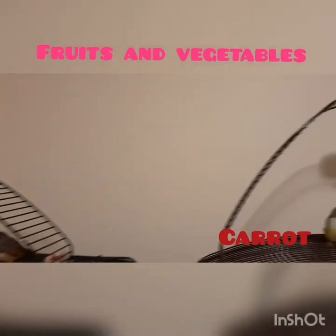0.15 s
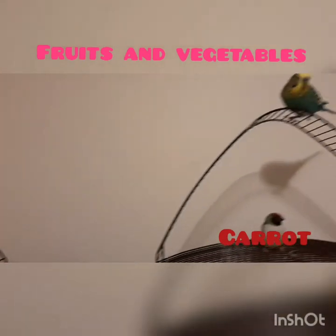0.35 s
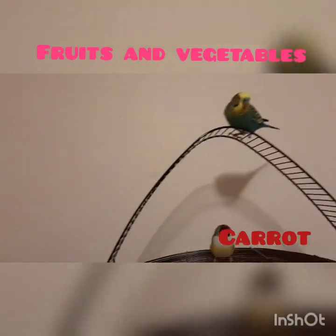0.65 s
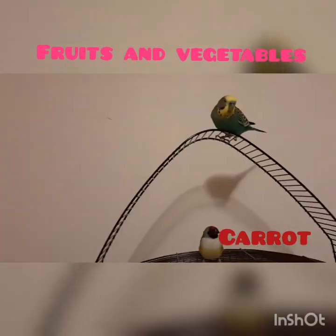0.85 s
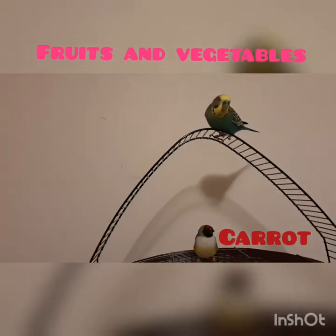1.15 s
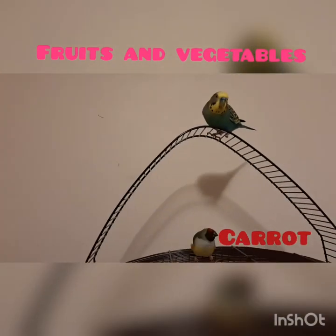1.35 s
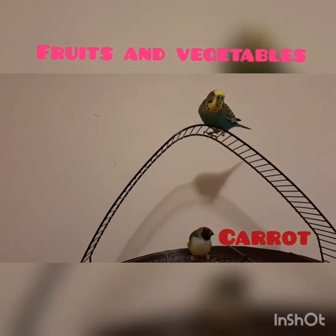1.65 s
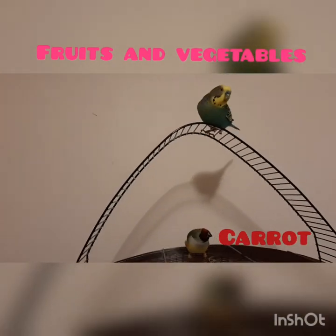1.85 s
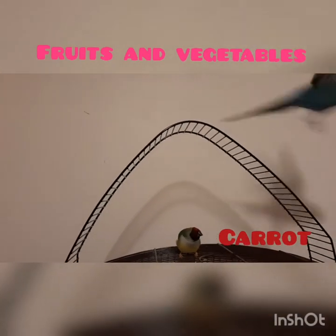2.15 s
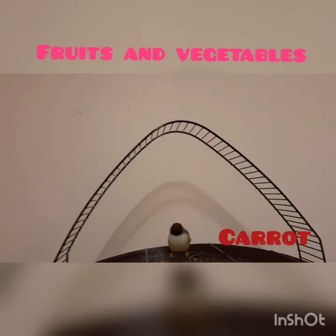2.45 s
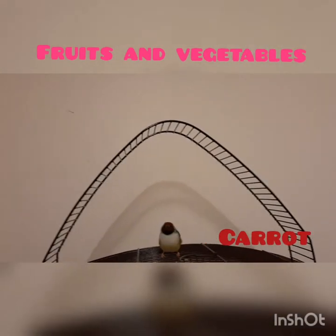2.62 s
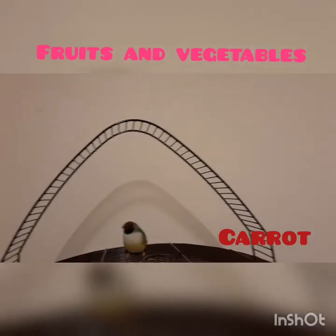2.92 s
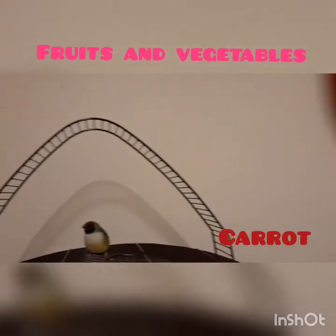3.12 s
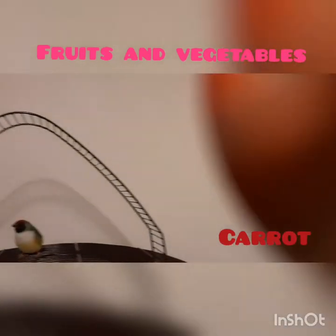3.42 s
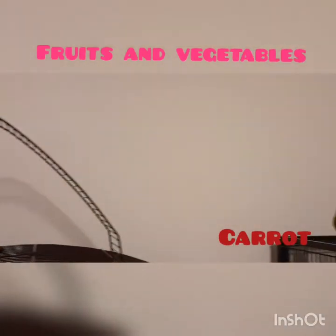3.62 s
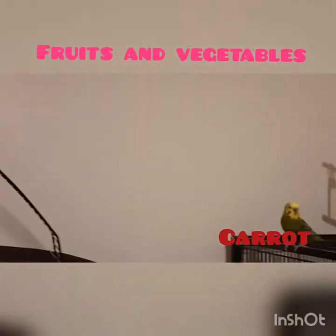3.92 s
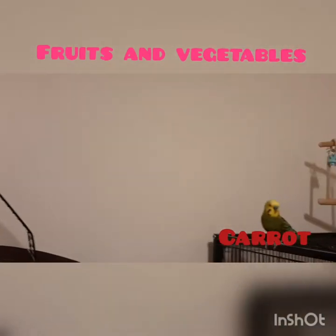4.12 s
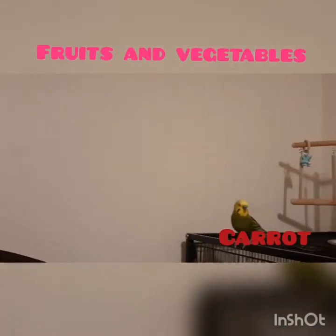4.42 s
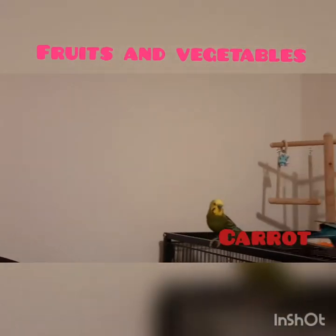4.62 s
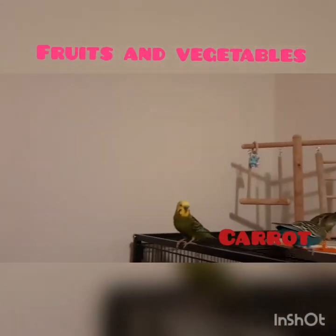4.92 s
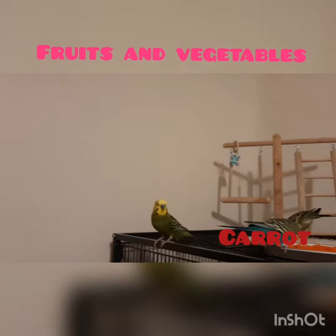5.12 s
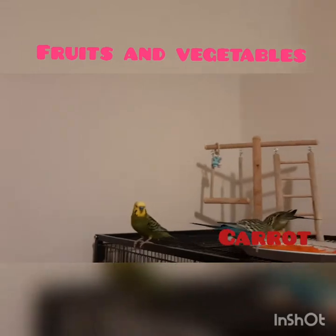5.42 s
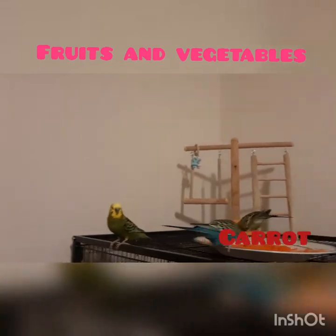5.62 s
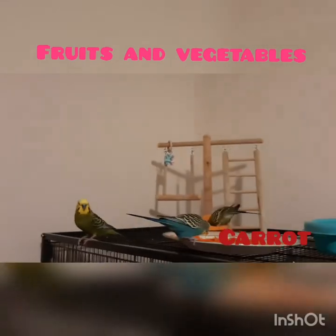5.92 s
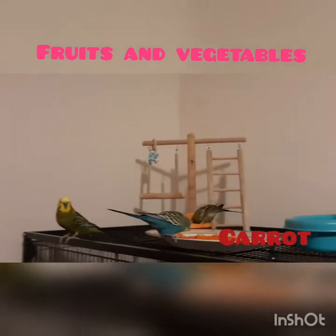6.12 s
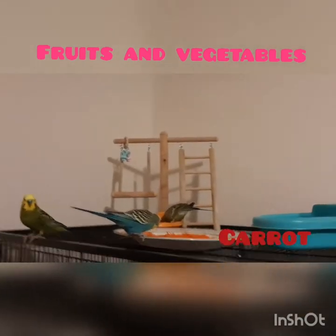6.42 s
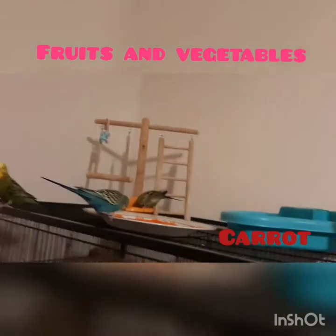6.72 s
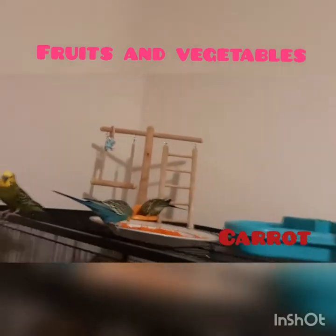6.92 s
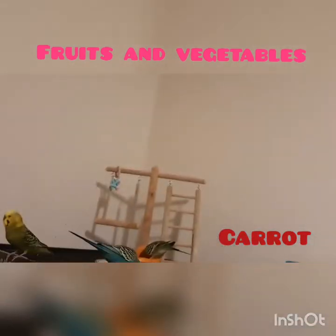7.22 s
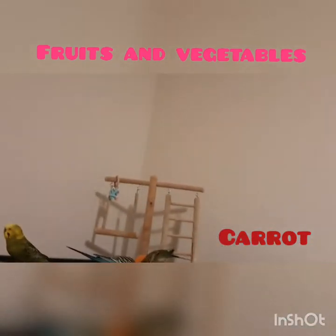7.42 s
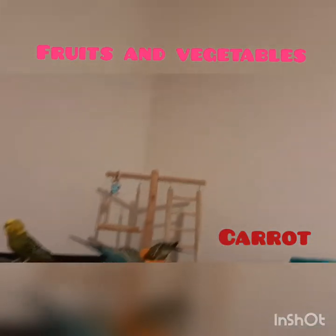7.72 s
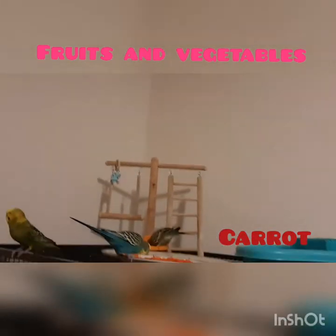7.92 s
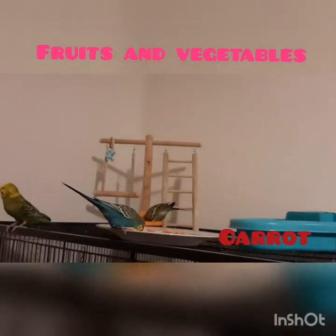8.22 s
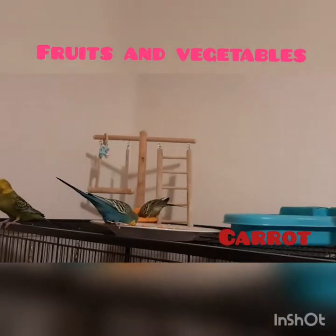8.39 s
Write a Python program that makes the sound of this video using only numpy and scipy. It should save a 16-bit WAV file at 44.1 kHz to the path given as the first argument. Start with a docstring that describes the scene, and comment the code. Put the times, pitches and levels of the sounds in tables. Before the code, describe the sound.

Scattered pet bird calls indoors, short nasal toots then sharp chirps and scratchy scolding, with feather swishes, soft bumps and a faint steady hum.

```python
"""Finches and budgerigars in a bare room

Pet birds call a metre or two from a hand-held phone, over a rush of room air and a faint hum.
Nasal notes, whistled chirps and raspy or warbled chatter are throat-filtered harmonics plus hiss, in a ringing room.
Feathers swish as shaped noise; a take-off puffs low noise at the microphone.
The hand adds ticks and soft bumps: short dry noise bursts."""
import sys
import numpy as np
from scipy import signal
from scipy.fft import rfft, irfft, next_fast_len
from scipy.io import wavfile
from scipy.ndimage import uniform_filter1d, minimum_filter1d

SR = 44100
rng = np.random.default_rng(int(sys.argv[2]) if len(sys.argv) > 2 else 0)


def dump(signal):
    """Clip the signal to [-1, 1] and save it as 16-bit WAV at the path in sys.argv[1]."""
    limited = np.clip(np.atleast_2d(signal).T, -1, 1)
    pcm = np.round(limited * 32767).astype(np.int16)
    wavfile.write(sys.argv[1], SR, pcm)


N = 377055
TIME_S = np.arange(N) / SR
TOP_HZ = 15800  # upper limit of harmonics and of the output

# room air, colour: [f/Hz, level/dB]
AIR_COLOUR = [(25, -38.5), (60, -17), (140, -17.5), (240, -9), (330, -4.5), (420, -0.5), (530, -0.5),
              (800, -10), (1400, -6.5), (1800, -13), (2600, -14), (4500, -21), (8500, -32.5), (15500, -28)]
# room air, level before trim: [t/s, level/dB]
AIR_LEVEL = [(0.0, -49.5), (0.74, -51), (1.29, -45.5), (2.21, -51.5), (3.79, -52.5), (4.86, -48.5),
             (6.0, -48), (6.43, -53), (8.55, -53.5)]
# room air, correlation of the two ports: [f/Hz, correlation/1]
AIR_CORRELATION = [(60, 0.68), (300, 0.77), (600, 0.7), (1200, -0.06), (3000, 0.08), (12000, -0.95)]
# room air, left minus right: [f/Hz, level/dB]
AIR_BALANCE = [(60, -6), (250, -2.5), (1000, -2), (2500, -4), (5000, -5.5), (12000, -4.5)]
HUM_HZ, HUM_DB = 410.3, -60.5

# wing draught, colour: [f/Hz, level/dB]
DRAUGHT_COLOUR = [(28, -12.5), (45, -5.5), (80, -2.5), (130, -7.5), (250, -21.5), (600, -40.5)]
DRAUGHT_PEAK_S, DRAUGHT_LEAD_S, DRAUGHT_DB = 2.51, 0.42, -47.5
DRAUGHT_RISE_DB_PER_S, DRAUGHT_FALL_DB_PER_S = 37, 130

# light ticks at the phone, level before decay: [t/s, level/dB, centre f/Hz, left minus right/dB]
TICKS = [(0.027, -25, 7000, -6), (0.164, -31, 6900, -9), (.301, -33, 5740, -9), (.972, -19, 4300, -6),
         (2.442, -25.5, 1410, 3.5), (3.053, -34, 9000, -2), (3.29, -23, 10900, -25.5),
         (3.424, -28, 10500, -20), (3.733, -24.5, 7700, -6), (4.368, -29.5, 11400, -22.5),
         (5.746, -40.5, 11000, -13)]
# bumps of the hand, level before trim: [t/s, level/dB, centre f/Hz]
BUMPS = [(0.331, -45, 120), (0.528, -42.5, 82), (3.038, -49, 92), (3.344, -45.5, 97), (3.759, -52, 62),
         (4.041, -42.5, 176), (5.789, -41.5, 66.5), (6.65, -45.5, 64), (6.893, -34.5, 123)]
TICK_DECAY_S, BUMP_PAN_DB = 0.0005, -16

# feather flicks, level before swell: [t/s, length/s, level/dB, tilt/(dB/octave)]
FLICKS = [(0.019, 0.032, -36, 2.5), (.465, 0.071, -48.5, 8), (2.161, .18, -50.5, 2),
          (5.705, 0.079, -48.5, 2), (6.625, 0.086, -45, 2.5), (8.007, 0.028, -49, 1.5)]
# feather colour before tilt: [f/Hz, level/dB]
FEATHER_COLOUR = [(700, 6), (2000, 14.5), (5000, 9.5), (8000, -2.5), (11000, -2.5), (15000, -4.5)]

# reverberation: [f/Hz, T60/s]
ROOM_T60 = [(1500, 0.53), (3000, 0.41), (5000, 0.5), (9000, .38), (15000, 0.42)]
# share of the nominal port level difference that is applied: [f/Hz, share/1]
PORT_SHADOW = [(1500, 0.9), (2700, 0.85), (4200, 0.81), (6300, 0.84), (8500, 0.69), (14000, 0.46)]

# what throat and beak let through, before brightness: [f/Hz, level/dB]
NASAL_THROAT = [(750, -25), (1500, -13.5), (2250, -17.5), (3000, -2.5), (3800, 0), (4550, 0.5),
                (5300, -7.5), (6100, -15.5), (7600, -22), (8900, -35.5), (12000, -24.5), (15500, -41.5)]
WHISTLE_THROAT = [(2300, -23), (3000, -19.5), (4200, 6), (5800, -2), (7000, -10), (8200, -18),
                  (9900, -10.5), (10800, -20), (12200, -16.5), (13500, -21), (15500, -30)]
LOW_THROAT = [(2300, -13.5), (3200, -0.5), (4600, -1), (6100, -7), (7500, -28), (9200, -27), (12000, -27),
              (15500, -38.5)]
SHARP_THROAT = [(2050, -23), (2500, -11), (3300, -4.5), (4200, -1.5), (5200, -1), (6200, -8), (7500, -14),
                (9000, -21.5), (10200, -19.5), (12600, -16.5), (15500, -26)]
CHIRRUP_THROAT = [(1500, -37), (1900, -21), (2400, -2), (3000, 4.5), (3700, -6), (4500, -12.5),
                  (5600, -21.5), (6500, -25.5), (7700, -26.5), (9300, -38), (11000, -42.5), (14000, -40)]
RASP_THROAT = [(1200, -45), (1900, -21.5), (2500, -9.5), (3400, 3), (4500, -4), (5800, 3.5), (7000, -11.5),
               (8600, -15.5), (10000, -18.5), (15500, -24)]
# raspy syllables, before bend, swell and room:
# [t/s, length/s, f/Hz, level/dB, 3-6 kHz brightness/(dB/octave), roughness/1 (clipped to 0-1)]
RASPS = [(3.08, .15, 625, -33.5, -3.5, 0.84), (3.282, .14, 603.3, -31.5, -2, 0.84),
         (3.45, .12, 605.5, -32.5, -6, 1.02), (3.72, .12, 593.6, -35, -2.5, 1.06),
         (3.9, 0.11, 596, -36.5, -6, 0.85), (5.056, 0.032, 959, -44.5, 8, 0.53),
         (5.08, 0.062, 968, -28.5, 7, 0.8), (6.115, 0.072, 944, -48.5, -6, 0.82)]
# soft warbled syllables: columns as RASPS
WARBLES = [(.77, .18, 2910, -40, 8, 0.81), (.935, 0.11, 2746, -36.5, -7.5, 0.62),
           (2.872, 0.049, 3540, -41, 3, 0.42), (2.905, 0.104, 2897, -37.5, 3, 0.97),
           (2.99, 0.065, 3596, -38.5, 6.5, 1.06), (4.52, 0.11, 2960, -51, 16, 1.1),
           (4.67, 0.11, 2710, -48, 14.5, 1.07), (5.56, .11, 2912, -46.5, 24.5, .36),
           (5.68, 0.098, 2495, -47, 4.5, 0.9), (6.555, 0.059, 2133, -44.5, 8, 0.39),
           (6.612, 0.085, 3307, -38.5, 1.5, 0.44)]
# notes of the loud calls, before quaver, gate and room; where two overlap, both sides of the syrinx sing:
# [t/s, length/s, first f/Hz, middle f/Hz, last f/Hz, level/dB, swell over the note/dB, roughness/1, voice]
NOTES = [(1.154, 0.036, 722, 745, 735, -31.5, 6.5, 0.02, "nasal"),
         (1.193, 0.045, 748.5, 765.8, 748, -23.5, 0, 0.05, "nasal"),
         (1.316, 0.081, 712, 727.3, 757.5, -25, 4.5, 0.13, "nasal"),
         (1.662, 0.028, 4780, 4330, 4410, -31.5, 18, 0.22, "long"),
         (1.682, 0.024, 4290, 4440, 4340, -20.5, 18, 0.12, "long"),
         (1.692, 0.052, 4754, 4890, 4810, -18.5, 4.5, 0.14, "long"),
         (1.712, 0.049, 3220, 2985, 3138, -21, 10.5, 0.11, "low"),
         (1.714, 0.05, 4470, 4420, 4300, -14.5, 6, .24, "long"),
         (1.75, 0.067, 4182, 4057, 4215, -13.5, -1.5, .08, "long"),
         (2.538, 0.013, 3600, 3840, 3970, -22.5, 0.5, 0.3, "rising"),
         (2.553, 0.012, 4320, 4087, 3940, -10, -2, 0.18, "rising"),
         (2.542, 0.0079, 2490, 2334, 2320, -18.5, 0, 0.31, "low"),
         (2.565, 0.019, 4350, 4950, 6060, -14.5, -3, 0.1, "rising"),
         (2.586, 0.017, 5760, 6057, 5907, -13.5, -4.5, 0.16, "rising"),
         (6.265, 0.0062, 1880, 1850, 1860, -27, -5, 0.14, "sharp"),
         (6.272, 0.011, 3280, 2555, 2470, -17.5, 5.5, 0.22, "sharp"),
         (6.283, 0.011, 2503, 2460, 2880, -15, -6, 0.18, "sharp"),
         (6.294, 0.019, 2094, 2092, 2110, -23, -6.5, 0.22, "sharp"),
         (6.303, 0.015, 2906, 2582, 2750, -16.5, -0.5, .19, "sharp"),
         (7.071, 0.025, 1637, 1730, 1850, -39, 29, 0.27, "chirrup"),
         (7.097, 0.042, 1843, 1875, 1760, -25, 1, 0.26, "chirrup"),
         (7.135, 0.011, 2276, 2394, 2580, -25.5, 4, .4, "chirrup"),
         (7.142, 0.037, 2843, 2920, 2915, -23, 0, 0.19, "chirrup"),
         (7.163, 0.0423, 1683, 1745, 1680, -24, -6, 0.46, "chirrup")]
# voices: [throat, direct over room/dB, nominal left minus right/dB, lag of the right port/ms]
VOICES = {"nasal": (NASAL_THROAT, -0.5, -6, .37), "long": (WHISTLE_THROAT, -4, -10, .45),
          "low": (LOW_THROAT, -1, -9, .45), "rising": (WHISTLE_THROAT, 1.9, -5.5, .18),
          "sharp": (SHARP_THROAT, 6, -5.5, .19), "chirrup": (CHIRRUP_THROAT, 0, 3.5, .35)}
NOTE_ATTACK_S, NOTE_RELEASE_S = 0.003, 0.002
QUAVER_SHARE, QUAVER_RATE_HZ = 0.061, 220  # random pitch spread at roughness 1; new values per second


def undb(db):
    """Decibels to amplitude gain."""
    return 10 ** (np.asarray(db) / 20)


def unit(x):
    """Scale to rms 1."""
    return x / np.sqrt(np.mean(x ** 2) + 1e-18)


def at_hz(points, hz):
    """Interpolate (f/Hz, value) points on a log-frequency axis."""
    f, value = np.transpose(points)
    return np.interp(np.log(np.maximum(hz, 1)), np.log(f), value)


def noise(colour, size):
    """Gaussian noise of a given colour and rms 1, falling away below the lowest point."""
    hz = np.fft.rfftfreq(size, 1 / SR)
    low_cut = np.minimum(hz / colour[0][0], 1) ** 2
    gain = undb(at_hz(colour, hz)) * low_cut
    return unit(irfft(rfft(rng.standard_normal(size)) * gain, size))


def wander(rate_hz, size):
    """Random line through rate_hz new Gaussian values per second."""
    steps = np.arange(size) * rate_hz / SR
    count = int(steps[-1]) + 2
    return np.interp(steps, np.arange(count), rng.standard_normal(count))


def arch(length_s):
    """Swell and fade: root of a half sine."""
    return np.sqrt(np.sin(np.linspace(0, np.pi, int(length_s * SR))).clip(0))


def pan(db):
    """Gains of the left and right port for a left-minus-right level."""
    return undb(np.array([[db], [-db]]) / 2)


def add(out, start_s, x):
    """Mix x into out at start_s."""
    i = max(int(start_s * SR), 0)
    out[:, i:i + x.shape[-1]] += x[..., :N - i]


def background(air_trim_db=2, waver=0.25):
    """Coloured room air, partly correlated between the ports, plus a wavering sine: an appliance hum."""
    hz = np.fft.rfftfreq(N, 1 / SR)
    correlation = at_hz(AIR_CORRELATION, hz).clip(-1, 1)
    mid = rfft(noise(AIR_COLOUR, N)) * np.sqrt((1 + correlation) / 2)
    side = rfft(noise(AIR_COLOUR, N)) * np.sqrt((1 - correlation) / 2)
    lean = undb(at_hz(AIR_BALANCE, hz) / 2)
    air = irfft(np.array([(mid + side) * lean, (mid - side) / lean]), N)
    air_db = np.interp(TIME_S, *np.transpose(AIR_LEVEL)) + air_trim_db
    hum = np.sin(2 * np.pi * HUM_HZ * TIME_S) * np.sqrt(2) * (1 + waver * wander(13, N))
    return air * undb(air_db) + hum * undb(HUM_DB) * pan(-1.5)


def draught():
    """Wing air of a take-off: low noise that builds to a peak and dies away faster."""
    t = TIME_S - DRAUGHT_PEAK_S
    db = DRAUGHT_DB + np.minimum(DRAUGHT_RISE_DB_PER_S * t, -DRAUGHT_FALL_DB_PER_S * t)
    onset = ((t + DRAUGHT_LEAD_S) / 0.059).clip(0, 1)
    return noise(DRAUGHT_COLOUR, N) * undb(db) * onset * pan(-5)


def shake(colour, size, apart=0.57):
    """Noise common to both ports plus a separate share in each."""
    common = noise(colour, size)
    separate = np.array([noise(colour, size) for _ in range(2)])
    return unit(common + apart * separate)


def handling(skirt_db=-15, bump_rise_s=0.013, bump_trim_db=-7):
    """Dry contact noise at the phone: fast-decaying band noise ticks, dull bumps with a slower push."""
    out, t = np.zeros((2, N)), TIME_S[:SR // 5]
    for start_s, db, hz, pan_db in TICKS:
        colour = [(hz / 4, skirt_db), (hz, 0), (hz * 2, skirt_db), (hz * 10, 2 * skirt_db)]
        tick = shake(colour, len(t)) * np.exp(-t / TICK_DECAY_S)
        add(out, start_s, tick * undb(db) * pan(pan_db))
    push = t / bump_rise_s * np.exp(1 - t / bump_rise_s)
    for start_s, db, hz in BUMPS:
        colour = [(hz * 0.44, -8), (hz, 0), (hz * 2, -16), (hz * 10, -70)]
        thud = shake(colour, len(t)) * push
        add(out, start_s, thud * undb(db + bump_trim_db) * unit(pan(BUMP_PAN_DB)))
    return out


def room(x, direct_db, pan_db, lag_ms, early_db=-5, build_s=0.0047):
    """Direct sound, a few early echoes off cage and wall, then a dense tail with its own decay per band."""
    t = TIME_S[:int(SR * 3 / 4)]
    hz = np.fft.rfftfreq(len(t), 1 / SR)
    spectrum, tail = rfft(rng.standard_normal((2, len(t)))), 0
    centres_hz = [f for f, _ in ROOM_T60]
    for share, (_, t60_s) in zip(np.eye(len(centres_hz)), ROOM_T60):
        band = irfft(spectrum * np.interp(hz, centres_hz, share), len(t))
        tail = tail + band * np.exp(-np.log(1000) * t / t60_s)
    response = unit(tail * (1 - np.exp(-t / build_s))) / np.sqrt(len(t))
    lag = int(abs(lag_ms) * SR / 1000)
    response[[0, 1], [0, lag]] += undb(direct_db)  # right port later
    for port in response:
        echoes = rng.integers(SR // 400, SR // 70, size=3)
        port[echoes] += undb(direct_db + early_db) * rng.uniform(-1, 1, size=3)
    # the phone's body shades one port; the difference shrinks in the top treble
    size = next_fast_len(len(x) + len(t))
    shade = pan(pan_db) ** at_hz(PORT_SHADOW, np.fft.rfftfreq(size, 1 / SR))
    return irfft(rfft(x, size) * rfft(response, size) * shade, size)


def feathers():
    """Brief swishes of wings and ruffled plumage: tilted noise under an arch, in the room."""
    out = np.zeros((2, N))
    for start_s, length_s, db, tilt_db in FLICKS:
        swell = arch(length_s)
        colour = [(hz, level_db + tilt_db * np.log2(hz)) for hz, level_db in FEATHER_COLOUR]
        swish = noise(colour, len(swell)) * swell * undb(db)
        add(out, start_s, room(swish, direct_db=-5.5, pan_db=-6, lag_ms=0.2))
    return out


def syrinx(hz, rough, throat, bright_db=0, jitter=0.1426, flutter_hz=1500, hiss=0.78, shimmer=0.67):
    """Throat-shaped harmonics; roughness shakes pitch and strength and lets air hiss through."""
    size = len(hz)
    shaken_hz = hz * (1 + jitter * rough * wander(flutter_hz, size))
    phase = 2 * np.pi * np.cumsum(shaken_hz) / SR
    k = np.arange(1, int(TOP_HZ / hz.min()) + 1)[:, None]
    throat = [(f, db + bright_db * np.log2(np.clip(f, 3000, 6000) / 3000)) for f, db in throat]
    gains = undb(at_hz(throat, k * hz)) * (k * hz < TOP_HZ)
    tone = (gains * np.sin(k * phase)).sum(axis=0)
    tone = tone / np.sqrt((gains ** 2).sum(axis=0) / 2)  # even strength as the pitch moves
    breath = hiss * rough * noise(throat, size)
    return unit((tone + breath) * np.exp(shimmer * rough * wander(400, size)))


def chatter(syllables, throat, direct_db, pan_db, bend):
    """Short rough syllables whose pitch lifts as they swell."""
    out = np.zeros((2, N))
    for start_s, length_s, hz, db, bright_db, rough in syllables:
        effort = arch(length_s)
        bent_hz = hz * (1 + bend * (effort - effort.mean()))
        sound = syrinx(bent_hz, np.clip(rough, 0, 1), throat, bright_db) * effort
        add(out, start_s, room(sound * undb(db), direct_db, pan_db, lag_ms=0.44))
    return out


def note(length_s, pitches_hz, swell_db, rough, throat):
    """One breath through the syrinx: a quavering pitch arc with attack, swell and release."""
    t = TIME_S[:int(length_s * SR)]
    along = t / length_s
    arc_hz = np.polyval(np.polyfit([0, 0.5, 1], pitches_hz, 2), along)
    hz = arc_hz * (1 + QUAVER_SHARE * rough * wander(QUAVER_RATE_HZ, len(t)))
    gate = np.minimum(t / NOTE_ATTACK_S, (length_s - t) / NOTE_RELEASE_S).clip(0, 1)
    return syrinx(hz, rough, throat) * gate * undb(swell_db * (along - 0.5))


def loud_calls():
    """Three nasal notes, then four chirps of linked notes; each voice has its own throat and place."""
    out = np.zeros((2, N))
    for start_s, length_s, first_hz, middle_hz, last_hz, db, swell_db, rough, voice in NOTES:
        throat, direct_db, pan_db, lag_ms = VOICES[voice]
        pitches_hz = (first_hz, middle_hz, last_hz)
        sound = note(length_s, pitches_hz, swell_db, np.clip(rough, 0, 1), throat)
        add(out, start_s, room(sound * undb(db), direct_db, pan_db, lag_ms))
    return out


def scene():
    """Sum of room air and hum, draught, handling, feathers and bird voices."""
    warbles = chatter(WARBLES, CHIRRUP_THROAT, direct_db=-5.0, pan_db=-9.0, bend=0.094)
    rasps = chatter(RASPS, RASP_THROAT, direct_db=-3.5, pan_db=-10.0, bend=0.092)
    return background() + draught() + handling() + feathers() + warbles + rasps + loud_calls()


def record(dry, ceiling_db=-1.5):
    """The phone's limiter turns down peaks above the ceiling; a steep low-pass then cuts the top."""
    peak = np.abs(dry).max(axis=0) + 1e-9
    allowed = np.minimum(1, undb(ceiling_db) / peak)
    gain = uniform_filter1d(minimum_filter1d(allowed, size=441), size=441)  # 10 ms hold and smoothing
    low_pass = signal.ellip(10, 0.2, 90, TOP_HZ, fs=SR, output="sos")
    return signal.sosfilt(low_pass, dry * gain)


dry = scene()
out = record(dry)
dump(out)
```